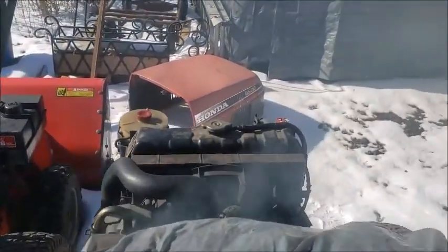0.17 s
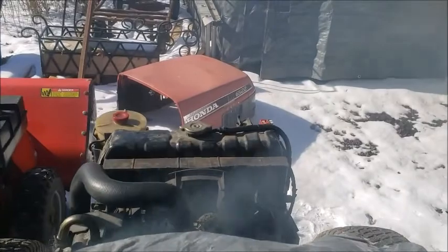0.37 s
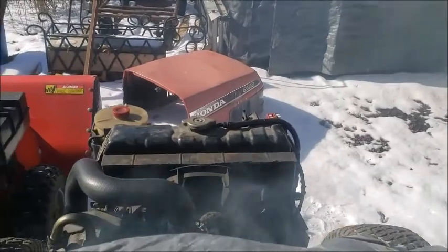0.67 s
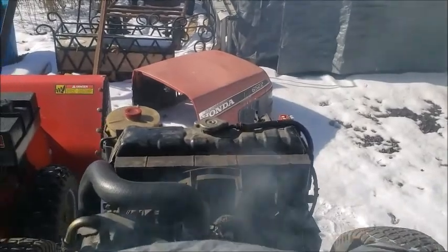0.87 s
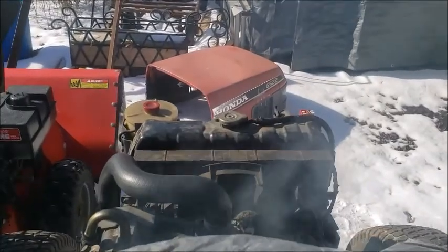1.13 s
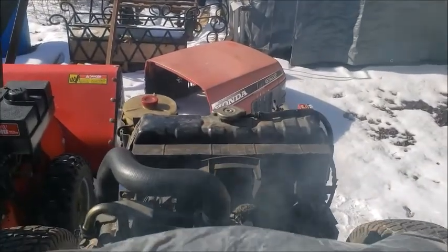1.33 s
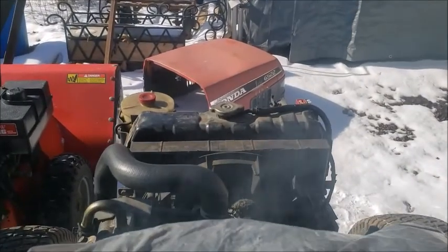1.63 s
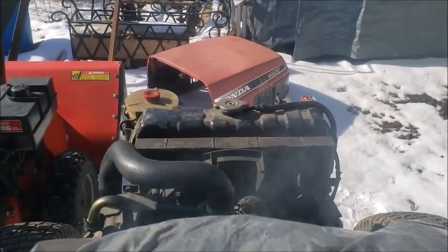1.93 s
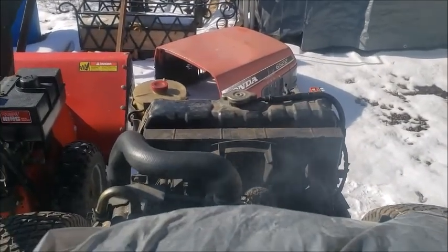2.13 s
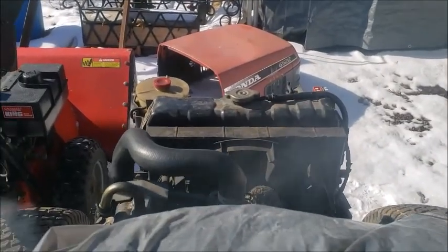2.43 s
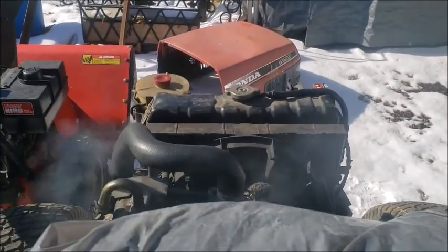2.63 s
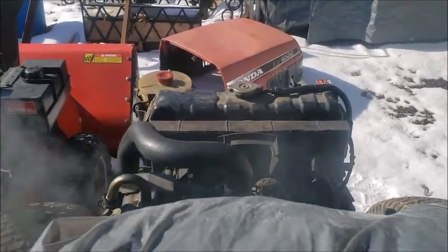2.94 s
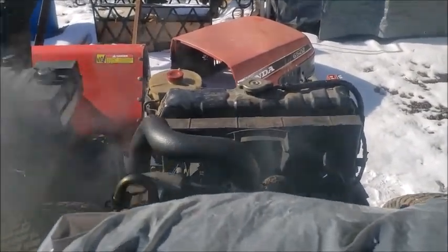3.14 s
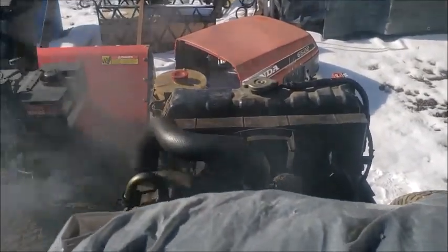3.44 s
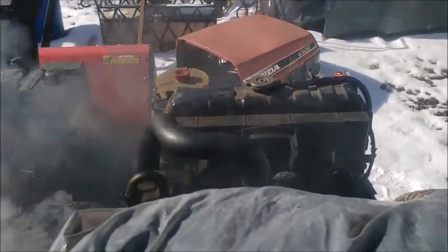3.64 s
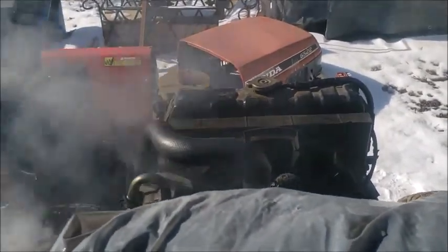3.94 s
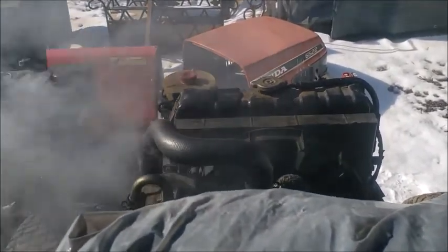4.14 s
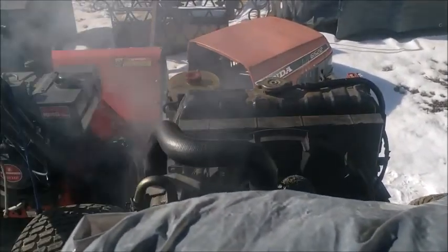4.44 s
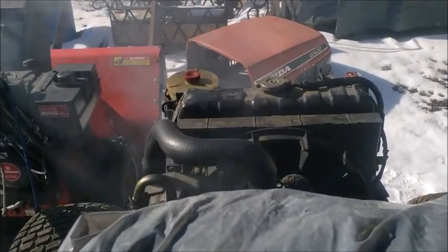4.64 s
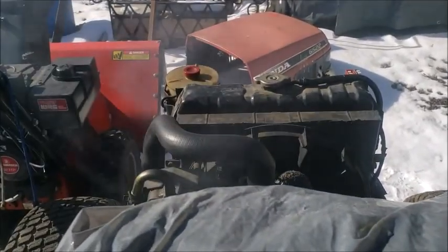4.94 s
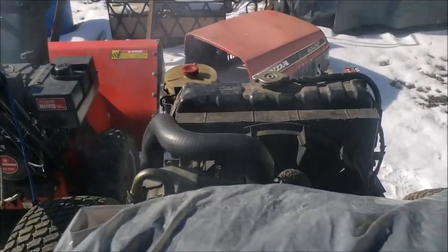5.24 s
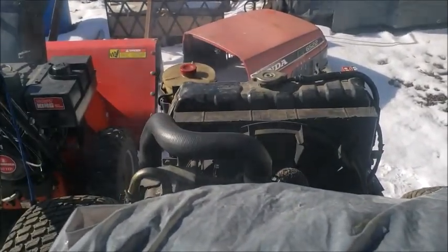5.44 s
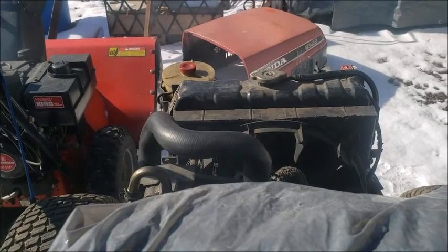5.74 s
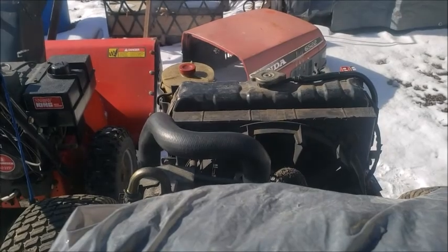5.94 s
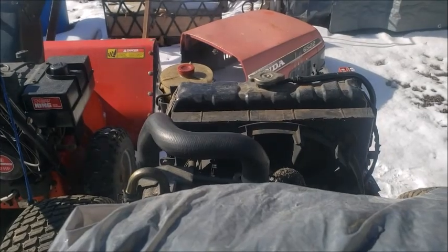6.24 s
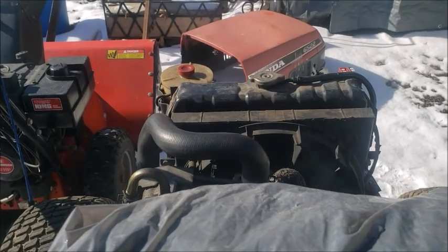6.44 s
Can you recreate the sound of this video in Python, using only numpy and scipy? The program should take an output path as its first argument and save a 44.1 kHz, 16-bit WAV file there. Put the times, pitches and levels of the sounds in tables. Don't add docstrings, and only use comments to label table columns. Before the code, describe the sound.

A stereo, close and dry outdoor capture with light electronic hiss. From 0 s a quiet low blower hum with ducted air grows, fullest around 1.2-1.9 s. A small dry snap comes at 0.8 s; key and cloth crackles follow at 1.15-1.4 and 1.75-2 s, close on the right. At 1.95 s the starter bites and grinds, then heaves again at 2.24 s, teeth ringing the metal housing while the blower sags in pitch. Near 2.5-2.7 s come clanks and the first firing. Until about 3.9 s the engine chugs unevenly: deep hollow pops rising in pitch, weak misses between, with clatter, tappet ticks, bright gas spits, dry snaps and short high belt squeals. Pulses spread out and it dies, with a weak kick back at 4.2 s, soft knocks and a last faint turn near 4.5 s. The hum recovers pitch and gently swells to 6.6 s, with sparse tiny rustles and a dull nudge at 6 s.

```python
import sys
import numpy as np
from scipy import signal
from scipy.fft import rfft, irfft
from scipy.io import wavfile
from scipy.ndimage import uniform_filter1d

SR = 44100
rng = np.random.default_rng(int(sys.argv[2]) if len(sys.argv) > 2 else 0)


def gain_from_db(level_db):
    decades = np.asarray(level_db, float) / 20
    return 10 ** decades


def store_pcm(level_fs):
    pcm = np.round(np.clip(level_fs, -1, 1) * 32767).astype(np.int16)
    wavfile.write(sys.argv[1], SR, np.atleast_2d(pcm).T)


N = 291060

# f/Hz, likeness; f/Hz, left-right/dB; f/Hz, left lead/rad
BLOWER_SIDE = [
    [(60, 0.97), (180, 0.88), (550, 1), (1650, 0.048), (4970, -0.26), (15000, -1.4)],
    [(60, -2.5), (130, -2), (290, -6), (640, -3), (1410, 6.5), (3100, 5), (6820, -24.5), (15000, -12)],
    [(0, -2), (780, 1.2), (1720, -0.84), (2580, 4.5), (6290, 0), (16000, 0)],
]
ENGINE_SIDE = [
    [(60, 0.39), (500, 1), (1500, 0.14), (4000, 0.12), (12000, 0.23)],
    [(60, 4), (130, 15), (290, -15), (640, -7.5), (1410, 5), (3100, 5), (6820, -8.5), (15000, -5.5)],
    [(0, 2.9), (600, 0.3), (900, 1.56), (1200, 1.95), (1720, 4.1), (3010, 9.2), (16000, 18.54)],
]
EXHAUST_SIDE = [
    [(60, 1), (1000, 1)],
    [(60, -3), (150, -4), (280, -8), (600, -4)],
    [(0, 0), (60, 0.26), (170, 0), (300, 0.34), (600, 1.4)],
]
STARTER_SIDE = [
    [(60, 1), (16000, 1)],
    [(450, -4), (600, -2), (825, -8), (900, -2), (1200, -2), (1650, 6), (2500, 6), (4970, -1)],
    [(0, 0), (400, .7), (600, .9), (880, 1.3), (1200, 2.1), (1720, 3.5), (2500, 7.2), (16000, 18)],
]

# f/Hz, level/dB per Hz
MIC_HISS = [(4120, -54), (7000, -52), (8690, -5), (11100, 8.5), (11700, 12), (15000, -3.5), (15800, -14),
            (16300, -23)]

# t/s, level/dB
BLOWER_LEVEL = [(0.0, -49.5), (0.5, -45), (1.21, -38.5), (1.91, -39), (2.13, -40.5), (2.79, -49),
                (3.12, -46.5), (3.73, -46.5), (4.32, -48), (4.8, -48.5), (5.51, -47.5), (6.21, -46),
                (6.6, -41.5)]
# t/s, speed/turns per s
SHAFT_SPEED = [(0, 102.7), (1.9, 102.8), (2.1, 97), (2.5, 90), (4, 93), (4.5, 95.5), (4.9, 97.8),
               (5.33, 100.3), (5.75, 102), (6.6, 102.9)]
# multiple of shaft speed, level/dB
SHAFT_ORDERS = [(3, -1), (4, -.3), (8.5, -20)]
# f/Hz, width/Hz, level/dB
DUCT = [(128.6, 7.4, -8.5), (175, 7, -10.5), (233, 3.1, -9.5), (285.2, 7.1, -12.5), (521, 98, -8.5)]
# f/Hz, level/dB per Hz
AIR_ROAR = [(15, -42), (30, -6), (53, -1), (97, -9), (200, -8), (350, -8), (590, -5), (730, -23.5),
            (900, -16.5), (1370, -27), (2300, -32.5), (8000, -48), (10400, -88), (17600, -120)]

# t/s, level/dB, width/s
POPS = [
    (.0118, -25, .00022),
    (6.0377, -26, .0004),
]
# t/s, length/s, level/dB, left-right/dB
FLURRIES = [
    (1.155, 0.042, -24, -16),
    (1.226, 0.07, -33.5, -14),
    (1.384, 0.016, -30.5, -15),
    (1.763, 0.035, -26.5, -29),
    (1.819, 0.12, -30, -20),
    (1.939, 0.013, -27, -10),
]
# t/s, level/dB
RUSTLES = [(.4474, -42), (1.2988, -25), (1.3249, -30), (1.96, -12), (2.0228, -26), (4.443, -44),
           (4.9894, -42.5), (5.1686, -39), (5.559, -39), (5.5832, -40.5), (5.7994, -44), (5.8194, -46),
           (6.0346, -38), (6.56, -39)]
# f/Hz, level/dB per Hz
CRACKLE_COLOUR = [(1470, -51), (2500, -13), (3500, -14.5), (3820, -14), (5740, -15.5), (8570, -18),
                  (11600, 1), (15000, -14.5), (16300, -9.5)]
# t/s, level/dB, ping over body/dB
SNAPS = [
    (0.817, -17.5, -11),
    (2.766, -18, -17),
    (2.873, -14, -10),
    (3.039, -22, -5.5),
    (3.369, -31, 11),
    (3.459, -18, 2),
    (3.564, -14.5, -5.5),
    (3.663, -23, -9),
]

# t/s, level/dB, f/Hz
TICKS = [(1.907, -36, 1840), (1.939, -26, 2420), (1.957, -21, 1527), (2.243, -32, 1060), (2.565, -31, 1210),
         (2.583, -22.5, 1487), (2.683, -25, 2970), (2.729, -21, 1510), (2.796, -21, 2010),
         (2.835, -25, 1840), (2.891, -31, 1510), (3.003, -27, 1190), (3.181, -24.5, 2540),
         (3.267, -29, 1760), (3.329, -43, 1300), (3.408, -35, 1810), (3.477, -27, 2290), (3.513, -41, 1170),
         (3.578, -24, 4550), (3.614, -34, 2270), (3.711, -45, 1570), (3.732, -39, 1370),
         (3.805, -32.5, 2550), (3.916, -21.5, 2520)]
# f/Hz, left-right/dB
TICK_PAN = [(1250, -2), (1550, 11), (2300, 8), (4500, 12)]
# f/Hz, ring time/s (a fall of 60 dB takes 2.5 times as long)
TICK_RING_TIME = [(1200, 0.026), (2500, 0.012), (4500, 0.0086)]
# t/s, level/dB, f/Hz, left-right/dB, ring time/s (a fall of 60 dB takes 2.5 times as long)
THUDS = [(2.386, -30, 1104, 6, .13), (4.107, -45, 880, -13, .05), (4.113, -46, 1250, -8, .04),
         (4.117, -48, 1650, -8, .03), (4.084, -50, 3300, -1, .008), (4.097, -50, 3800, -1, .008),
         (4.285, -41, 764, -14, .06), (4.287, -44, 1200, -5, .04), (4.289, -46, 1600, -5, .03),
         (4.288, -48, 3450, -5, .015), (4.288, -51, 4700, -5, .015), (4.587, -50, 2250, 1, .03),
         (4.59, -48, 2520, 1, .03), (6.034, -38, 3750, -6, .007), (6.036, -41, 1400, -6, .012),
         (5.559, -50, 5700, -10, .006), (3.834, -44, 3300, 6, .012)]

# t/s, level/dB
EFFORT = [(2.1, -28), (2.45, -6.5), (2.87, 1.5), (3.05, 1), (3.75, -5.5), (4.1, -13), (4.2, -26),
          (4.6, -48)]
# f/Hz, level/dB per Hz
CLATTER = [(290, 0.5), (500, 0.5), (576, -11), (757, -5), (1170, -11), (1510, -8.5), (1680, -15),
           (2960, -12), (8500, -20.5), (11000, -64), (18700, -120)]
# f/Hz, level/dB per Hz
INTAKE_RUSH = [(6000, -60), (8500, -18.5), (11500, -0.5), (13500, -7), (16300, -17)]
# t/s, hold/s, level/dB
BELT_SLIPS = [(2.80, .02, -46), (2.835, 0.0088, -30), (2.875, .01, -43), (2.94, .008, -33),
              (3.028, 0.028, -36), (3.07, .025, -51), (3.127, 0.0059, -39), (3.16, .015, -38),
              (3.215, 0.023, -33), (3.31, 0.012, -34), (3.35, .02, -49), (3.415, .005, -43),
              (3.45, 0.037, -43), (3.515, .005, -42), (3.555, .01, -41), (3.615, 0.019, -34),
              (3.65, 0.05, -41), (3.836, 0.026, -32.5), (3.87, 0.032, -43), (3.94, 0.025, -43),
              (4.06, .03, -56)]

# t/s, level/dB, mid over top band/dB
SPITS = [(2.585, -29, -8), (2.676, -16, -9.5), (2.725, -50, 15), (2.795, -21.5, -6), (2.894, -22.5, -15),
         (2.9785, -15.5, -6.5), (3.178, -27.5, -7.5), (3.2682, -12.5, -11), (3.327, -40.5, 5),
         (3.41, -38, -0.5), (3.478, -27.5, -19), (3.573, -15.5, -8.5), (3.808, -31.5, -13),
         (3.916, -16, -12.5), (2.99, -29, -5), (3.925, -34, -9.5)]
# f/Hz, level/dB per Hz
SPIT_MID = [(530, 3), (900, -23), (2250, -2), (3750, -7), (4380, -8), (8000, -12.5), (10400, -55),
            (17600, -120)]
SPIT_TOP = [(4710, -19), (8000, -19.5), (8520, -20.5), (11200, -3), (13000, -7), (15900, -18), (16300, -39)]
# f/Hz, width/Hz, level/dB
MANIFOLD = [(556, 38, 14), (730, 69, 7.5), (1187, 28, 4), (1717, 41, 7.5), (2520, 180, 2), (3270, 110, 2.5),
            (4270, 81, 3), (5250, 220, -8), (6450, 99, -10)]

# t/s, push/s, grind/dB, gear hiss/dB
HEAVES = [
    (1.957, 0.2, -28, -38.5),
    (2.18, 0.013, -48, -38),
    (2.221, .015, -51, -41.5),
    (2.238, 0.2, -29.5, -36.5),
    (2.42, .05, -42, -44),
    (2.565, 0.02, -29, -31),
    (2.725, 0.013, -33, -41),
]
FREE_RUN = 1.94, 0.61, -45
# f/Hz, width/Hz, level/dB
HOUSING = [(880, 69, 14.5), (1108, 73, 12), (1510, 35, 8.5), (2527, 56, 5), (4700, 53, -29)]
# f/Hz, level/dB per Hz
GEAR_HISS = [(350, -14), (600, -8.5), (689, -14), (896, -14), (1370, -11.5), (1540, -7), (1940, -20.5),
             (2520, -14), (5040, -18), (7420, -31.5), (11900, -19.5), (13800, -23), (16300, -38)]
# t/s, level/dB, f/Hz
CATCHES = [(1.959, -27, 977), (1.989, -28, 1014), (2.010, -29.5, 902), (2.024, -37, 854), (2.041, -24, 896),
           (2.064, -25.5, 850), (2.094, -21, 918), (2.125, -24.5, 876), (2.152, -27, 883),
           (2.17, -38, 1510), (2.241, -30.5, 897), (2.260, -44, 1160), (2.274, -32, 1510),
           (2.289, -35, 880), (2.314, -26, 884), (2.336, -35, 2574), (2.339, -25, 912), (2.363, -29, 992),
           (2.375, -22, 880), (2.384, -19, 932), (2.402, -22, 1092), (2.419, -31, 1068), (2.437, -41, 1105)]
# t/s, level/dB, f/Hz, t60/s
CLANKS = [(2.562, -29, 624, 0.055), (2.562, -26, 966, 0.057), (2.563, -41.5, 840, 0.33),
          (2.564, -34, 2570, .04), (2.564, -27, 3050, .04), (2.568, -23, 1400, 0.064),
          (2.598, -38, 1490, 0.062), (2.584, -28.5, 1088, 0.1), (2.584, -29, 4570, .03),
          (2.584, -27.5, 4950, 0.029), (2.586, -43, 455, .08), (2.676, -34, 700, 0.059),
          (2.724, -35, 670, 0.044), (2.726, -37.5, 1100, 0.15), (2.727, -27, 3160, .03),
          (2.734, -33.5, 4700, .03), (2.838, -39, 730, 0.071), (2.99, -34.5, 813, 0.075),
          (3.178, -33, 715, 0.046), (3.41, -42, 850, 0.066), (3.272, -41, 830, 0.15),
          (3.574, -40.5, 810, 0.13), (3.578, -40, 1167, .07), (3.92, -32, 4300, 0.06),
          (3.922, -46, 816, 0.086), (3.922, -46, 1660, 0.065)]
# t/s, level/dB, f/Hz, t60/s
PINGS = [(2.039, -40, 3900, .025), (2.064, -36, 3620, .025), (2.155, -37.5, 2500, 0.036),
         (2.222, -43, 6000, .03), (2.243, -34, 4700, .03), (2.241, -33, 2600, .03), (2.345, -36, 5500, .05),
         (2.364, -30, 2800, 0.034), (2.377, -37, 5300, .03), (2.395, -40, 4300, .04),
         (3.183, -42, 4500, .03), (3.809, -43, 4400, .03), (3.81, -47, 5300, .03), (2.3, -40, 1900, 0.022),
         (3.73, -40, 2900, 0.022), (2.894, -35, 2580, 0.027), (3.92, -37, 6100, .03),
         (3.329, -35, 3360, .03), (3.513, -40, 3000, .03), (3.578, -34, 5400, .03),
         (3.272, -34, 5600, 0.027)]

# t/s, level/dB, length/s
HOT = [
    (166, 291, 3.6),
    [(2.9883, -7.5, 0.048), (3.2764, -8, 0.053), (3.5828, -8.5, 0.0568), (3.9237, -10.5, 0.07)],
]
WARM = [
    (147.7, 274, 5.9),
    [(2.8992, -8.5, 0.06), (3.1844, -9.5, 0.064), (3.4828, -10, 0.068), (3.8127, -12.5, 0.087)],
]
FIRST_FIRE = (156.2, 290, 1.9), [(2.687, -12, .077)]
COLD = (134, 276, 2.7), [(2.8022, -9, 0.07)]
HALF_BURNT = (131, 234, 8), [(2.533, -17.5, 0.119)]
KICK_BACK = (114, 96, 18), [(4.2245, -20.5, .017)]
MISFIRE = (124, 152, 24), [(3.0765, -18.5, 0.11), (3.3702, -17, 0.1), (3.6825, -18.5, 0.126)]
SLOW_TURN = (117, 120, 35), [(2.3342, -15, 0.1), (4.041, -19.5, 0.18), (4.4782, -29.5, 0.18)]
# t/s, level/dB, f/Hz
PIPE_NOTES = [(1.96, -36, 227), (1.972, -29, 447), (2.688, -15.5, 164.5), (2.796, -32.5, 614),
              (3.476, -33.5, 498), (3.924, -28, 166), (2.531, -31, 310), (2.632, -32, 252),
              (2.803, -23, 389), (2.901, -28.5, 367), (2.984, -30.5, 350), (2.984, -27.5, 598),
              (3.045, -23.5, 306), (3.272, -24, 333), (3.272, -31, 584), (3.335, -30, 295),
              (3.575, -31.5, 574), (4.22, -27.5, 198.5), (3.92, -30.5, 570)]
# t/s, level/dB
JOLTS = [
    (1.97, -34),
    (4.23, -41),
]
# f/Hz, level/dB per Hz
BLOCK = [(30, -10), (60, 5.5), (100, -5), (190, 3), (300, -8), (420, -5.5), (700, -30.5), (1500, -80)]


def evened(x):
    return x / np.sqrt(np.mean(x ** 2) + 1e-20)


def wander(shape, smooth):
    return evened(uniform_filter1d(rng.standard_normal(shape), smooth))


def read(points, hz):
    f, value = np.transpose(points)
    return np.interp(np.log(hz + 40), np.log(f + 40), value)


def curve(rows):
    s, value = np.transpose(rows)
    return np.interp(np.arange(N) / SR, s, value, left=-120, right=-120)


def humps(rows, rise_db_per_s, fall_db_per_s, swell_db_per_s=0.):
    t = np.arange(N) / SR
    levels = []
    for s, hold, db in rows:
        rise = rise_db_per_s * np.maximum(s - t, 0)
        fall = fall_db_per_s * np.maximum(t - s - hold, 0)
        swell = swell_db_per_s * np.clip(s + hold - t, 0, hold)
        levels.append(db - rise - fall - swell)
    return np.max(levels, axis=0)


def add(mix, s, sound):
    part = mix[..., round(s * SR):][..., :sound.shape[-1]]
    part += sound[..., :part.shape[-1]]


def resonate(x, hz, width):
    turn = np.exp(2j * np.pi * np.cumsum(hz * np.ones(N)) / SR)
    r = np.exp(-np.pi * width / SR)
    return 2 * (turn * signal.lfilter([1 - r], [1, -r], x / turn)).real


def ports(x, side, other=None):
    hz, z = np.fft.rfftfreq(N, 1 / SR), rfft(x)
    same = np.clip(read(side[0], hz), -1, 1)
    tilt = gain_from_db(read(side[1], hz) / 2)
    lead = read(side[2], hz)
    right = z if other is None else same * z + np.sqrt(1 - same ** 2) * rfft(other)
    pair = np.array([z * tilt * np.exp(1j * lead), right / tilt])
    return irfft(pair * 2 / (tilt + 1 / tilt), N)


def noise(spectrum, patchy_db=0., grain_db=0.):
    patches = uniform_filter1d(rng.standard_normal((N // 128 + 5, 257)), 12, 0)
    patches = evened(uniform_filter1d(patches, 4, 1)).T
    grain = gain_from_db(grain_db * wander(N, 40))
    z = signal.stft(rng.standard_normal((2, N)) * grain, nperseg=512, noverlap=384)[2]
    z = z * gain_from_db(patchy_db * patches[:, :z.shape[2]])
    x = signal.istft(z, nperseg=512, noverlap=384)[1][:, :N]
    colour = gain_from_db(read(spectrum, np.fft.rfftfreq(N, 1 / SR)))
    return evened(irfft(rfft(x) * colour, N))


def rings(rows, rise_s):
    out, t = np.zeros(N), np.arange(6000) / SR
    for s, db, hz, t60 in rows:
        unsteady = 1 + 0.25 * wander(6000, 120)
        fade = gain_from_db(db + 5 - 60 * t / t60) * (1 - np.exp(-t / rise_s))
        add(out, s, fade * unsteady * np.sin(2 * np.pi * hz * t))
    return ports(out, STARTER_SIDE)


def loose_chatter():
    per_s, spread_db, t60 = 260, 4, 0.014
    size = gain_from_db(spread_db * np.minimum(rng.exponential(1, N), 3)) * (rng.random(N) < per_s / SR)
    part = rng.integers(0, 24, N)
    out, t = np.zeros(N), np.arange(1200) / SR
    fade = (1 - np.exp(-t / 0.0005)) * gain_from_db(-60 * t / t60)
    for k, hz in enumerate(np.geomspace(1200, 5500, 24)):
        out += signal.oaconvolve(size * (part == k), fade * np.sin(2 * np.pi * hz * t))[:N]
    return evened(out)


def microphone_hiss():
    level_db = -71 + np.array([[-9], [5]]) + 0.89 * (curve(BLOWER_LEVEL) + 49)
    return gain_from_db(level_db) * noise(MIC_HISS, 2.0, 0.94)


def blower():
    speed = curve(SHAFT_SPEED) * (1 + 0.0005 * wander(N, 6000))
    turns = 2 * np.pi * np.cumsum(speed) / SR
    waver = gain_from_db(0.6 * wander((len(SHAFT_ORDERS), N), 3000))
    tones = sum(gain_from_db(db) * w * np.sin(k * turns) for (k, db), w in zip(SHAFT_ORDERS, waver))
    duct = sum(gain_from_db(db) * evened(resonate(rng.standard_normal(N), hz, width)) for hz, width, db in DUCT)
    air = noise(AIR_ROAR, 1.5, 0.99) + gain_from_db(-3.5) * tones + gain_from_db(-2) * duct
    sound = gain_from_db(curve(BLOWER_LEVEL) + 1) * air
    return ports(sound[0], BLOWER_SIDE, sound[1])


def pops():
    out = np.zeros(N)
    for s, db, width in POPS:
        u = np.arange(-4, 8, 1 / (width * SR))
        rebound = 0.5 * np.exp(-((u - 2.4) / 1.6) ** 2)
        add(out, s - 4 * width, gain_from_db(db) * (rebound - np.exp(-u ** 2)))
    return out * gain_from_db([[-6], [2]])


def key_crackle():
    gap_s, spread_db, rustle_pan_db = 0.0105, 3, -21
    rows = [(s, db, rustle_pan_db) for s, db in RUSTLES]
    for start, length, db, pan_db in FLURRIES:
        late, size = rng.standard_normal((2, 16))
        times = start + gap_s * (np.arange(16) + 0.22 * late)
        rows += [(s, db + spread_db * v, pan_db) for s, v in zip(times, size) if s < start + length]
    level, t = np.zeros((2, N)), np.arange(900) / SR
    fade = np.exp(-t / 0.0024) + 0.2 * np.exp(-t / 0.02)
    for s, db, pan_db in rows:
        add(level, s, gain_from_db(db - 8.5 + np.array([[pan_db], [0]])) * fade)
    return level * noise(CRACKLE_COLOUR, 1.8, 0.9)[0]


def snaps():
    pan_db, edge_hz = -28, 5700
    out, t = np.zeros((2, N)), np.arange(600) / SR
    body = np.sin(2 * np.pi * 1000 * t) + 0.5 * np.sin(2 * np.pi * 1800 * t)
    body = np.exp(-t / 0.0006) * body
    ping = (np.exp(-t / 0.00019) + 0.089 * np.exp(-t / 0.0017)) * np.sin(2 * np.pi * 3600 * t)
    for s, db, ping_db in SNAPS:
        sound = body + gain_from_db(ping_db + 10.5) * ping
        add(out, s + 0.001035, gain_from_db(db - 3 + np.array([[pan_db], [0]])) * sound)
    return signal.lfilter(*signal.butter(2, edge_hz, fs=SR), out)


def ticks():
    out, t = np.zeros((2, N)), np.arange(3000) / SR
    rows = [(s, db, hz, read(TICK_PAN, hz), read(TICK_RING_TIME, hz)) for s, db, hz in TICKS]
    for s, db, hz, pan_db, t60 in rows + list(THUDS):
        ring = np.sin(2 * np.pi * hz * t) + 0.12 * np.sin(2 * np.pi * 1.83 * hz * t)
        unsteady = 1 + 0.45 * wander(3000, 40)
        fade = (1 - np.exp(-t / 0.0015)) * gain_from_db(-60 * t / (2.5 * t60))
        crack = 0.34 * rng.standard_normal(3000) * np.exp(-t / 0.0012)
        pan = np.array([[pan_db / 2], [-pan_db / 2]])
        add(out, s, gain_from_db(db - 7 + pan) * (ring * unsteady * fade + crack))
    return out


def belt_squeal():
    squeal_hz = 12625
    slow = uniform_filter1d(rng.standard_normal(N), 400)
    slip = gain_from_db(1.5 * evened(uniform_filter1d(slow, 400)))
    grit = resonate(rng.standard_normal((2, N)), squeal_hz, 120)
    grit = evened(resonate(grit, squeal_hz, 120))
    tone = np.sin(2 * np.pi * squeal_hz * np.arange(N) / SR + 14 * np.log(slip))
    level_db = humps(BELT_SLIPS, rise_db_per_s=1202, fall_db_per_s=800)
    return gain_from_db(level_db - 2) * slip * (0.55 * grit + 0.85 * tone)


def running():
    effort_db = curve(EFFORT)
    cover = evened(resonate(rng.standard_normal((2, N)), 1503, 35))
    valves = noise(CLATTER, 2.3, 0.52) + gain_from_db(-12 + 0.6 * effort_db) * cover
    valves = valves + gain_from_db(-14.5) * loose_chatter()
    clatter = gain_from_db(-50 + effort_db + 7.5) * valves
    rush = gain_from_db(-48.5 + 0.97 * effort_db + 2.5) * noise(INTAKE_RUSH, 2.2, 2.0)
    sound = clatter + rush + belt_squeal()
    return ports(sound[0], ENGINE_SIDE, sound[1])


def spits():
    spit_s = 0.01
    top, mid = np.zeros((2, N))
    u = np.arange(0, 6, 1 / (spit_s * SR))
    shape = (1 - np.exp(-(u / 0.5) ** 2)) * (np.exp(-u ** 2) + 0.2 * np.exp(-u / 3.5))
    for s, db, mid_db in SPITS:
        add(top, s - 0.002, gain_from_db(db - 5) * shape)
        add(mid, s - 0.002, gain_from_db(db + mid_db - 3) * shape)
    jet = top * noise(SPIT_TOP, 2.8, 0.78) + mid * noise(SPIT_MID, 3.5, 1.8)
    rattle = mid * rng.standard_normal((2, N)) * (rng.random(N) < 1500 / SR)
    ringing = sum(gain_from_db(db + 20.5) * resonate(rattle, hz, width) for hz, width, db in MANIFOLD)
    sound = jet + ringing
    return ports(sound[0], ENGINE_SIDE, sound[1])


def starter():
    start, push, grind, hiss = np.transpose(HEAVES)
    grind_db = humps(zip(start, push, grind), rise_db_per_s=1600, fall_db_per_s=398, swell_db_per_s=31)
    hissing = [*zip(start, push, hiss), FREE_RUN]
    hiss_db = humps(hissing, rise_db_per_s=1600, fall_db_per_s=343, swell_db_per_s=-9.5)
    teeth = rng.standard_normal((2, N)) * (0.25 + 2.5 * (rng.random(N) < 900 / SR))
    modes = [gain_from_db(db) * np.sqrt(width) * evened(resonate(teeth, hz, width)) for hz, width, db in HOUSING]
    sound = gain_from_db(grind_db - 4.5) * evened(sum(modes))
    sound = sound + gain_from_db(hiss_db) * noise(GEAR_HISS, 2.3, 1.5)
    sound = sound + gain_from_db(hiss_db - 10) * loose_chatter()
    catches = rings([(*row, 0.068) for row in CATCHES], rise_s=0.0038)
    blows = rings(list(CLANKS) + list(PINGS), rise_s=0.0024)
    return ports(sound[0], ENGINE_SIDE, sound[1]) + catches + blows


def stroke(db, low_hz, high_hz, length, sag_db):
    glide_bend, valve_shut = 2.75, 15.2
    t = np.arange(0, 1.6 * length, 1 / SR)
    rise = t / length
    turns = np.cumsum(low_hz + (high_hz - low_hz) * np.minimum(rise, 1.04) ** glide_bend) / SR
    level_db = -sag_db * rise + 1.5 * np.minimum(rise, 1) ** 4
    swing = (1 - np.exp(-t / 0.00073)) * gain_from_db(level_db) / (1 + rise ** valve_shut)
    rough = wander(9000, 200)[np.arange(len(t)) % 9000]
    swing = swing * (1 + 0.037 * rough)
    ring = np.sin(2 * np.pi * turns) + gain_from_db(-31.5) * np.sin(4 * np.pi * turns)
    gulp = np.exp(-((turns - 0.965) / 0.5) ** 2)
    gulp = signal.lfilter(*signal.butter(1, 45, "high", fs=SR), gulp)
    silencer = 0.15 * np.exp(-t / 0.035) * np.sin(2 * np.pi * 65 * t)
    silencer = silencer * signal.windows.tukey(len(t), 0.3)
    return gain_from_db(db) * (swing * ring - 1.13 * gulp - silencer)


def exhaust():
    burnt = FIRST_FIRE, HOT, WARM, COLD, HALF_BURNT, KICK_BACK
    unburnt = MISFIRE, SLOW_TURN
    out, t = np.zeros(N), np.arange(9000) / SR
    for sign, kinds in (0.87, burnt), (-0.81, unburnt):
        for (low_hz, high_hz, sag_db), rows in kinds:
            for s, db, length in rows:
                add(out, s, sign * stroke(db, low_hz, high_hz, length, sag_db))
    for s, db, hz in PIPE_NOTES:
        fade = gain_from_db(db + 6 - 60 * t / 0.095) * (1 - np.exp(-t / 0.0032))
        add(out, s, fade * np.sin(2 * np.pi * hz * t))
    jolt_db = humps([(s, 0, db) for s, db in JOLTS], rise_db_per_s=800, fall_db_per_s=62)
    shake_db = np.maximum(-33.5 + 0.51 * curve(EFFORT), jolt_db)
    shake = gain_from_db(shake_db) * noise(BLOCK, 1.1, 5.3)[0]
    return ports(out + shake, EXHAUST_SIDE)


def scene():
    background = microphone_hiss() + blower()
    close_by = pops() + key_crackle() + snaps()
    engine = ticks() + running() + spits() + starter() + exhaust()
    return background + close_by + engine


def band_limit(x):
    return signal.sosfilt(signal.butter(12, 16790, fs=SR, output="sos"), x)


def record(dry):
    hz = np.fft.rfftfreq(N, 1 / SR)
    bass_cut = 1 / (1 + (38 / (hz + 1)) ** 4)
    top_cut = 1 / (1 + (hz / 15850) ** 400)
    mix = irfft(rfft(dry) * bass_cut * top_cut, N)
    return band_limit(mix)


dry = scene()
out = record(dry)
store_pcm(out)
```